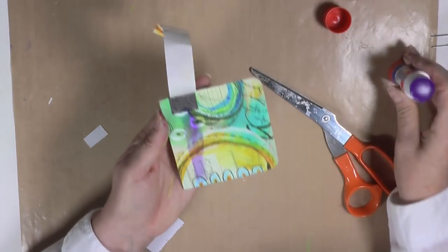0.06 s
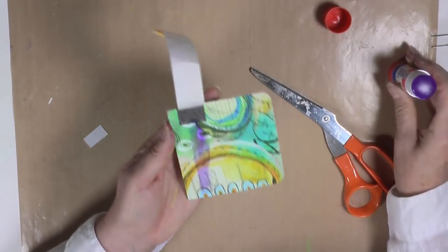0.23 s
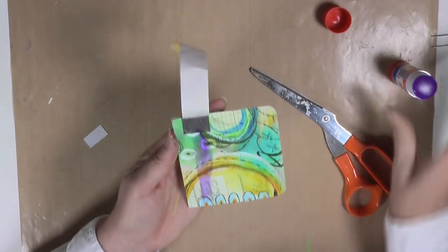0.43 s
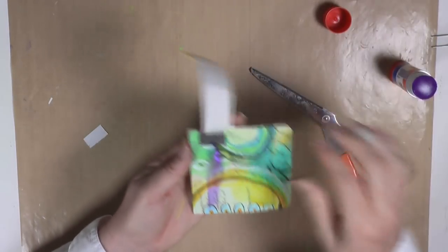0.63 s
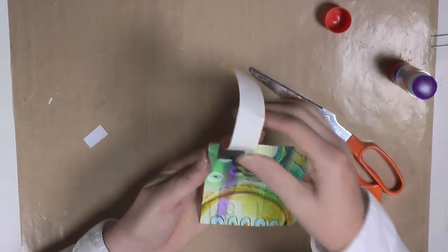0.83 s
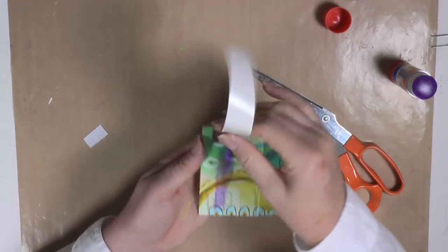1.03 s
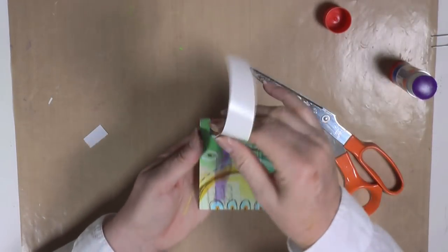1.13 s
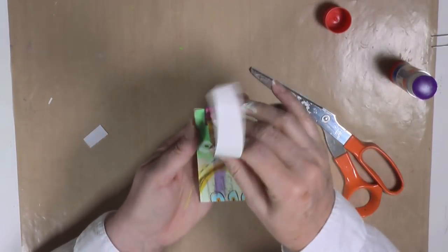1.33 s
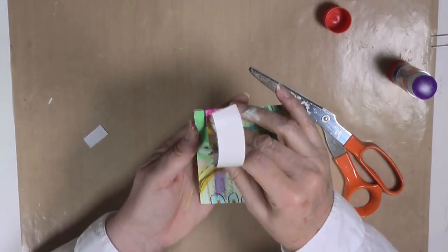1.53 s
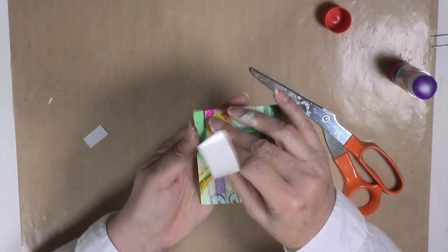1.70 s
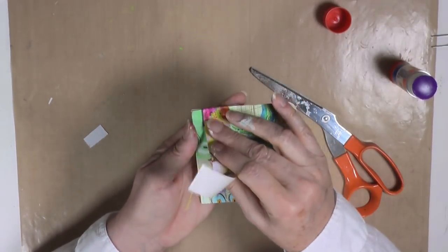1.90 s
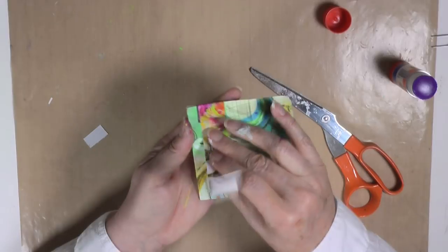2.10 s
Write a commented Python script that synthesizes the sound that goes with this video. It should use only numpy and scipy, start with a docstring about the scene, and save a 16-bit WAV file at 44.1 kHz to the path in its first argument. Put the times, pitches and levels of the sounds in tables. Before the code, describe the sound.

One loud, hollow knock of a glue stick set down, followed by quiet paper rustling.

```python
"""A glue stick is set down on a craft table with one hollow knock, its base ringing the table top.
Then a paper strip slides over cardstock under rubbing fingers and crackles as it is folded down.
Hands bump and brush softly, and a fan hums in the small room.
The knock overloads the microphone, whose gain control ducks and creeps back up."""
import sys
import numpy as np
from scipy import signal
from scipy.fft import rfft, irfft, next_fast_len
from scipy.io import wavfile

SR = 44100
rng = np.random.default_rng(int(sys.argv[2]) if len(sys.argv) > 2 else 0)


def store_wav(level_fs):
    """Save 16-bit WAV to argv[1]."""
    pcm = np.round(np.clip(np.atleast_2d(level_fs), -1, 1) * 32767)
    wavfile.write(sys.argv[1], SR, pcm.T.astype(np.int16))


N = 94815


def amp(db):
    """Decibels to gain."""
    return 10 ** (np.asarray(db) / 20)


def unit(x):
    """Scale to rms 1."""
    return x / np.sqrt(np.mean(x ** 2) + 1e-20)


def along(points, hz):
    """Read a curve of (freq_hz, value) points on a log frequency axis."""
    freqs, values = np.transpose(points)
    return np.interp(np.log(hz + 1), np.log(freqs + 1), values)


def clock():
    """Time of every sample in seconds."""
    return np.arange(N) / SR


def curves(rows):
    """Automation lanes: one value per sample for each column after the time."""
    times, *lanes = np.transpose(rows)
    return [np.interp(clock(), times, lane) for lane in lanes]


def during(rows):
    """A gate, open from the first automation point to the last."""
    return (clock() > rows[0][0]) & (clock() < rows[-1][0])


def filtered(x, response):
    """Filter x by a gain given as a function of frequency."""
    size = next_fast_len(N + SR // 2)
    return irfft(rfft(x, size) * response(np.fft.rfftfreq(size, 1 / SR)), size)[..., :N]


def coloured(x, eq):
    """Shape x with an EQ curve of (freq_hz, gain_db) points."""
    return filtered(x, lambda hz: amp(along(eq, hz)))


def burst(start, rise, hold, t60):
    """Envelope with attack, hold and exponential release, all in seconds."""
    t = np.maximum(clock() - start, 0)
    return (1 - np.exp(-t / rise)) * amp(-60 * np.maximum(t - hold, 0) / t60)


def swells(rows, eq):
    """Contact noise under smooth swells of pressure."""
    pressure = sum(amp(db) * np.exp(-((clock() - peak) / width) ** 2) for peak, db, width in rows)
    return pressure * unit(coloured(rng.standard_normal(N), eq))


def diffuse(pair):
    """Blend two unrelated signals into diffuse sound at two close microphone ports."""
    # likeness of left and right: freq_hz, correlation
    likeness = [(300, 0.94), (600, 0.9), (1200, 0.4), (2500, 0.37), (5000, 0.68), (10000, 0.97)]

    def mid_side_gains(hz):
        spread = np.arccos(along(likeness, hz)) / 2
        return np.array([np.cos(spread), np.sin(spread)])

    mid, side = filtered(pair, mid_side_gains)
    return np.array([mid + side, mid - side])


def fan(air_db=-36):
    """The fan lays down a steady bed of moving air and hum."""
    # low-heavy rush of air: freq_hz, gain_db
    air_eq = [(18, -62), (30, -17), (53, -11.5), (88, -1.5), (144, -8.5), (160, -11.5), (197, -2.5),
              (225, -12), (284, 0.5), (341, -14.5), (420, -9), (518, -18.5), (852, -25), (1400, -30),
              (2020, -29.5), (3320, -36), (3780, -37), (4660, -39.5), (15500, -41)]
    # motor tones and a thin electrical whine: pitch_hz, level_db
    tones = [(71, -48.5), (97, -46.5), (140, -49.5), (287, -49), (425, -56), (840, -58.5), (3945, -64)]
    air = unit(coloured(diffuse(rng.standard_normal((2, N))), air_eq))
    hum = sum(amp(db) * np.sqrt(2) * np.sin(2 * np.pi * (hz * clock() + rng.random()))
              for hz, db in tones)
    return amp(air_db) * air + hum


def hands():
    """Dull rumble and faint brushing as the hands shift on the table."""
    # soft bumps on the table: peak_s, level_db, width_s
    bumps = [(.1, -39.5, 0.07), (1.32, -41, 0.15), (1.7, -38.5, 0.097), (2.03, -37.5, 0.12)]
    # their bassy thud: freq_hz, gain_db
    bump_eq = [(25, -41), (50, 7), (75, 1.5), (110, 2), (140, 0), (200, -15), (300, -3), (380, -33),
               (460, -3.5), (800, -34.5), (3000, -83)]
    # fingers grazing the glue stick and card: peak_s, level_db, width_s
    brushes = [(.2, -52, .055), (.51, -52.5, 0.012), (.98, -53.5, 0.028), (1.08, -55.5, 0.079),
               (1.19, -53.5, 0.032)]
    # their airy whisper: freq_hz, gain_db
    brush_eq = [(400, -8), (1500, 2), (3000, -3), (4300, 1), (6200, -0.5), (7600, -38), (10000, -2),
                (15000, -8)]
    return swells(bumps, bump_eq) + swells(brushes, brush_eq)


def glue_stick(tick_db=-34.5, radiate_hz=178):
    """Each contact of the base ticks and rings the table; soft contacts reach only the low modes."""
    # the base lands, then rocks flat: start_s, level_db, cutoff_hz
    contacts = [(0.2311, -1.5, 2600), (0.2374, -10, 880), (0.2549, -23, 1300), (0.2722, -16, 1200)]
    # modes of the table top: pitch_hz, level_db, t60_s, rise_s
    modes = [(140, -38, 0.12, 0.0044), (264.5, -13, 0.31, 0.021), (304.4, -4, 0.15, 0.019),
             (338, -5, 0.17, 0.017), (364.5, -5, 0.16, 0.0057), (456.2, -1, 0.062, 0.00049),
             (491, -3.5, .12, 0.00087), (589.3, -15, 0.095, 0.003), (727.6, -11, 0.064, 0.0015),
             (793, -9.5, 0.046, 0.0004), (994, -19.5, 0.11, 0.0072), (1130, -24, 0.1, 0.0043),
             (1365, -18.5, 0.031, 0.0012), (1697, -17.5, 0.027, 0.0011)]
    # tick of plastic meeting the table: freq_hz, gain_db
    tick_eq = [(300, 5), (1200, -40), (2500, -2), (6000, -5.5), (15000, -22)]
    # the room's answer to the knock: freq_hz, gain_db
    reverb_eq = [(150, -21), (300, -15.5), (450, -14), (600, -1), (850, -2), (1200, 7.5), (1750, -2),
                 (2400, 9), (3500, -0.5), (5500, 0), (8000, -1)]
    knock = np.zeros(N)
    for start, level_db, cutoff_hz in contacts:
        t = clock() - start
        ring = np.zeros(N)
        for hz, db, t60, rise in modes:
            drive = amp(db) / np.sqrt(1 + (hz / cutoff_hz) ** 4)
            ring -= drive * burst(start, rise, 0, t60) * np.sin(2 * np.pi * hz * t)
        tick_noise = unit(coloured(rng.standard_normal(N), tick_eq))
        tick = tick_noise * burst(start, rise=0.00081, hold=0, t60=0.054)
        knock += amp(level_db) * (ring + amp(tick_db) * tick)
    # the table top radiates little deep bass
    knock = signal.sosfilt(signal.butter(2, radiate_hz, "highpass", fs=SR, output="sos"), knock)
    return knock + coloured(room(knock), reverb_eq)


def room(x, predelay_s=0.008):
    """The small room's stereo reverb: a noise tail whose lows ring longest."""
    # reverb time: freq_hz, t60_s
    decay = [(150, 0.65), (500, 0.34), (1200, 0.29), (4000, 0.31), (14000, 0.2)]
    hz, t, spectrum = signal.stft(rng.standard_normal((2, SR // 2)), SR, nperseg=256)
    fade = amp(-60 * t / along(decay, hz)[:, None])
    tail = signal.istft(spectrum * fade, SR, nperseg=256)[1]
    tail /= np.linalg.norm(tail[0])
    tail = np.pad(tail, ((0, 0), (int(predelay_s * SR), 0)))
    return diffuse(signal.fftconvolve(x[None], tail, axes=1)[:, :N])


def fibres(slips_per_s, slip_share=0.25):
    """Tiny slips of paper fibres carry a share of the power; the rest is smooth hiss."""
    slips = unit(rng.standard_normal(N) * (rng.random(N) < slips_per_s / SR))
    return np.sqrt(slip_share) * slips + np.sqrt(1 - slip_share) * rng.standard_normal(N)


def paper_crackles():
    """Each buckle of the strip is a short, dense run of fibre snaps."""
    # buckles of the strip: start_s, level_db, hold_s, tilt_db_per_octave
    buckles = [(1.033, -39, 0.0055, -3.5), (1.046, -50, 0.042, 0), (1.621, -41.5, .008, -12),
               (1.762, -38, .013, 2.5), (1.798, -48, 0.013, 1), (1.8211, -26.5, 0.0017, 0),
               (1.825, -29.5, 0.0052, 4.5), (1.8883, -32.5, 0.013, 3.5), (1.9342, -35.5, .012, 2.5),
               (2.015, -39.5, 0.01, 1), (2.0532, -24.5, 0.0072, -0.7), (2.084, -36, 0.0045, -3.5),
               (2.091, -35.5, 0.011, 2.5), (2.117, -44, .016, 3)]
    # crisp voice of the paper: freq_hz, gain_db
    paper_eq = [(300, -8), (700, -4), (1100, -13), (1500, 2), (1800, 4), (2200, 4.5), (2950, -5.5),
                (3400, 0), (3950, -8), (4450, 2), (5000, 1.5), (6200, -1), (7600, -5), (10000, 1),
                (15000, -2.5)]
    crackles = np.zeros(N)
    for start, db, hold, tilt in buckles:
        grain = fibres(slips_per_s=4000)
        snaps = filtered(grain, lambda hz: amp(along(paper_eq, hz) + tilt * np.log2(1 + hz / 1000)))
        crackles += amp(db) * unit(snaps) * burst(start, rise=0.0013, hold=hold, t60=0.031)
    return crackles


def paper_slide(shelf_hz=3700):
    """Paper on card: friction that swells and fades with the speed of the hand."""
    # the stroke, brighter as the strip is pressed flat: time_s, level_db, treble_db
    stroke = [(1.25, -70, 10), (1.305, -47, -3), (1.35, -33, -10), (1.385, -25, -3.5), (1.425, -21, -0.5),
              (1.46, -29, 4.5), (1.50, -31, 2), (1.54, -39.5, -1), (1.58, -51, 3.5), (1.66, -74, -3)]
    # rasp of paper on card: freq_hz, gain_db
    friction_eq = [(150, -37), (280, -3), (385, -8), (490, 2), (560, -12), (680, -0.5), (900, -5.5),
                   (1130, -9.5), (1380, -1.5), (1600, -6), (2000, -7.5), (2500, -2.5), (2900, -7),
                   (3450, -5.5), (4500, -10), (6400, -8.5), (7250, -19.5), (8600, -18), (9700, -11.5),
                   (15500, -20)]
    level_db, treble_db = curves(stroke)
    friction = unit(coloured(fibres(slips_per_s=6000), friction_eq))
    treble = filtered(friction, lambda hz: 1 - 1 / (1 + (hz / shelf_hz) ** 4))
    return during(stroke) * amp(level_db) * (friction + (amp(treble_db) - 1) * treble)


def finger_rub(half_width_hz=170):
    """Skin on card: dull friction in one hollow, rising resonance."""
    # the fingers' sweep along the card: time_s, level_db, pitch_hz
    sweep = [(1.41, -68, 300), (1.46, -30.5, 360), (1.485, -28, 504), (1.51, -27, 639), (1.54, -42.5, 671),
             (1.59, -66, 673)]
    level_db, pitch_hz = curves(sweep)
    noise = rng.standard_normal((2, N))
    rumble = filtered(noise, lambda hz: 1 / np.sqrt(1 + (hz / half_width_hz) ** 6))
    # shift the rumble up into a band around the gliding pitch
    phase = 2 * np.pi * np.cumsum(pitch_hz) / SR
    band = rumble[0] * np.cos(phase) + rumble[1] * np.sin(phase)
    return during(sweep) * amp(level_db) * unit(band)


def gain_control(x, limit_db=-4.5, attack_s=0.011, recover_db_per_s=2):
    """Peaks over the limit duck the gain quickly; it creeps back at a steady rate."""
    peak_db = 20 * np.log10(np.abs(x).max(axis=0) + 1e-9)
    over_db = np.maximum(peak_db - limit_db, 0)
    recovered_db = recover_db_per_s * clock()
    duck_db = np.maximum.accumulate(over_db + recovered_db) - recovered_db
    smoothing = np.exp(-1 / (attack_s * SR))
    return x * amp(-signal.lfilter([1 - smoothing], [1, -smoothing], duck_db))


def scene(paper_reverb_db=-7):
    """The knock and the paper work in the small room, over the hands and the fan."""
    paper = paper_slide() + finger_rub() + paper_crackles()
    return glue_stick() + paper + amp(paper_reverb_db) * room(paper) + hands() + fan()


def record(dry, top_hz=15900):
    """A microphone that favours the right, ducks, clips at full scale and cuts the highest treble."""
    # stereo lean: freq_hz, left_minus_right_db
    balance = [(100, -7.3), (1300, -7.3), (2400, -4), (15000, -3.5)]
    heard = filtered(dry, lambda hz: amp(along(balance, hz) * np.array([[.5], [-.5]])))
    clipped = np.clip(gain_control(heard), -1, 1)
    return filtered(clipped, lambda hz: hz < top_hz)


dry = scene()
out = record(dry)
store_wav(out)
```